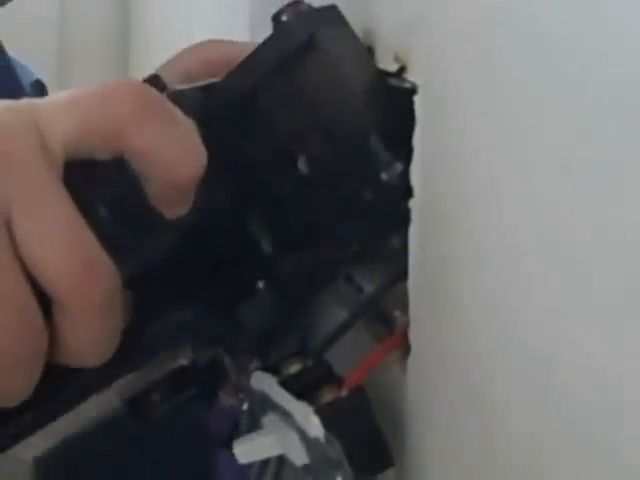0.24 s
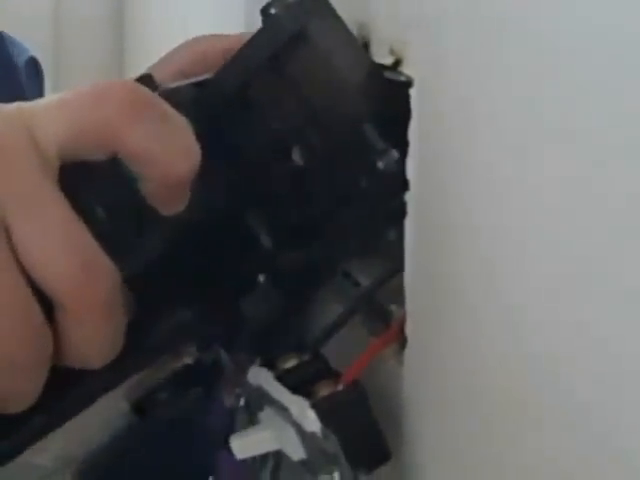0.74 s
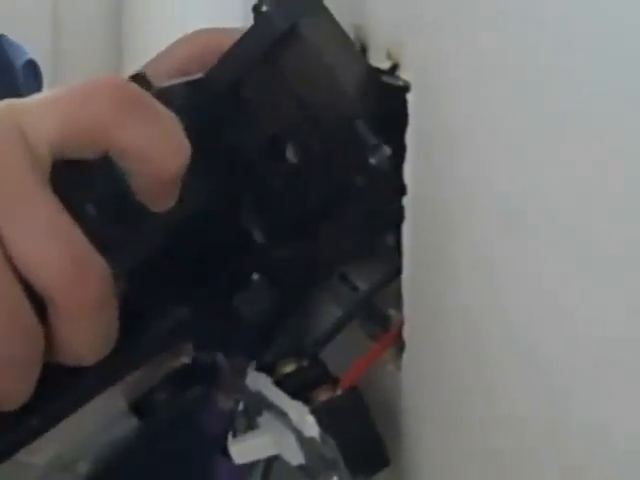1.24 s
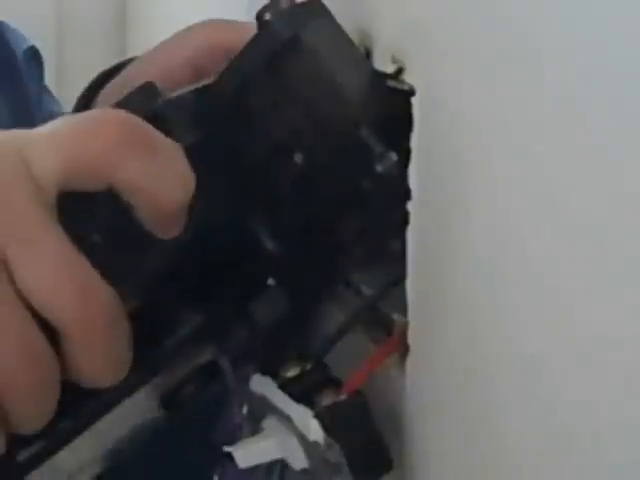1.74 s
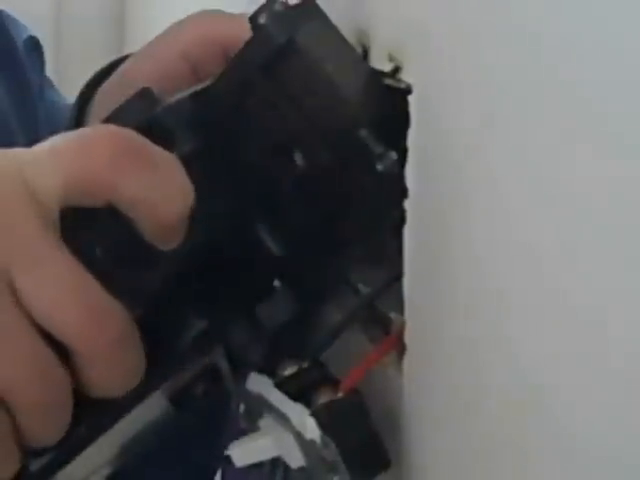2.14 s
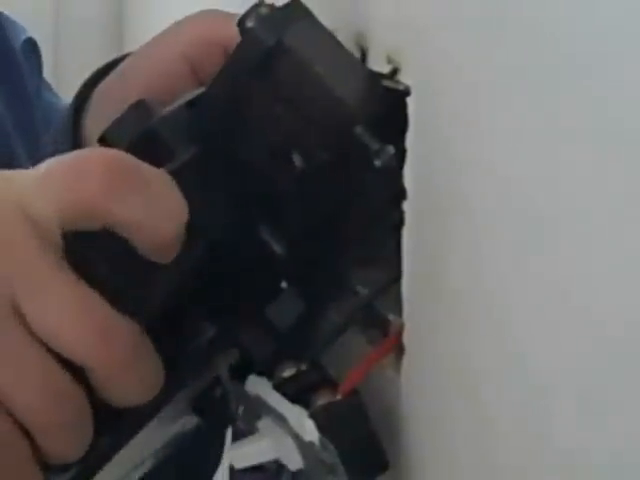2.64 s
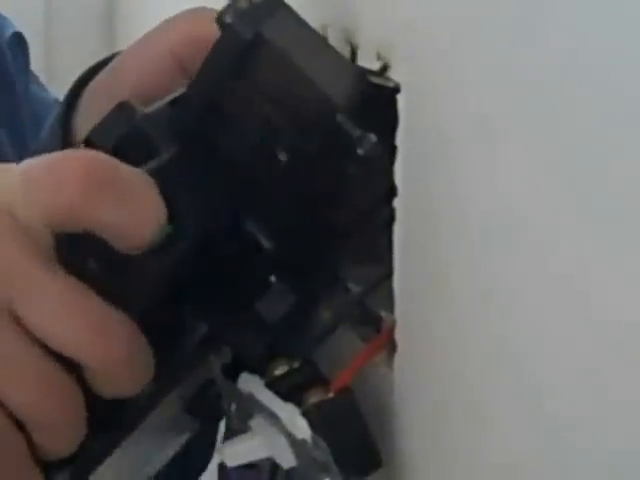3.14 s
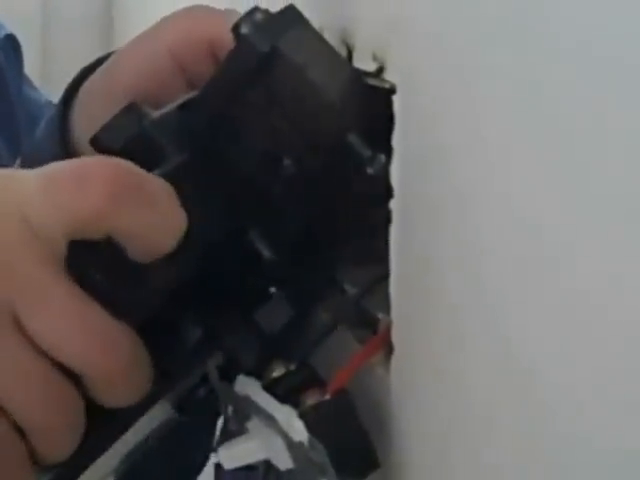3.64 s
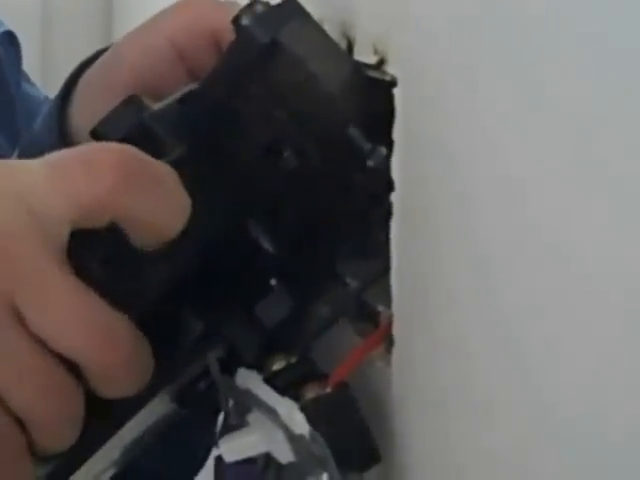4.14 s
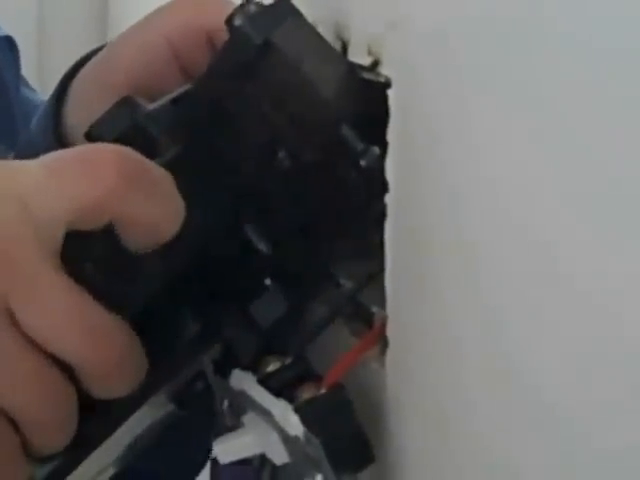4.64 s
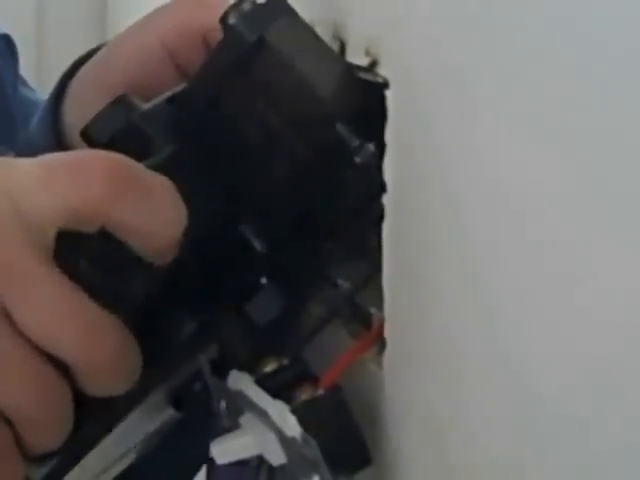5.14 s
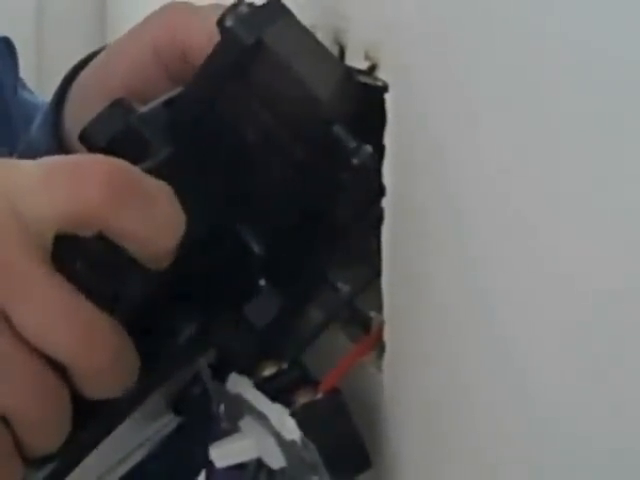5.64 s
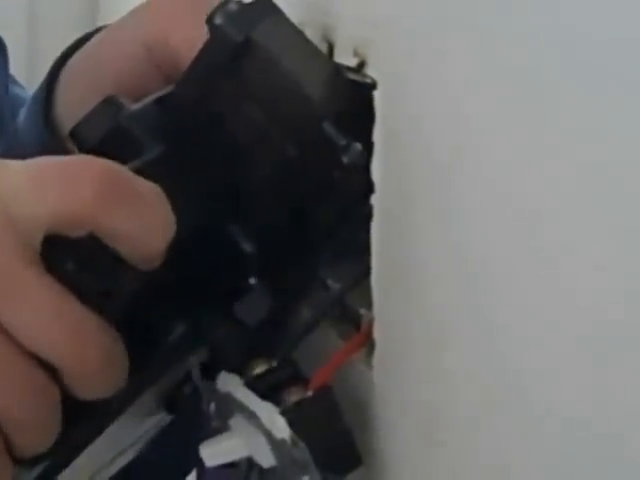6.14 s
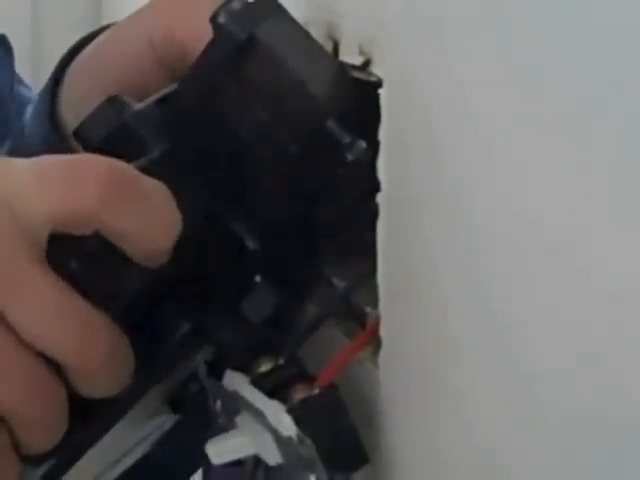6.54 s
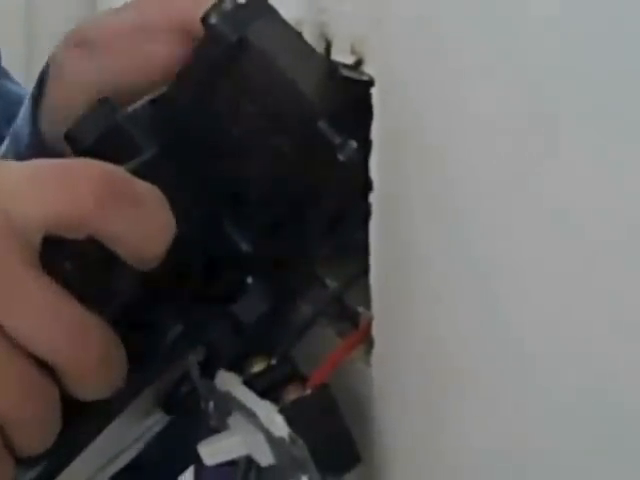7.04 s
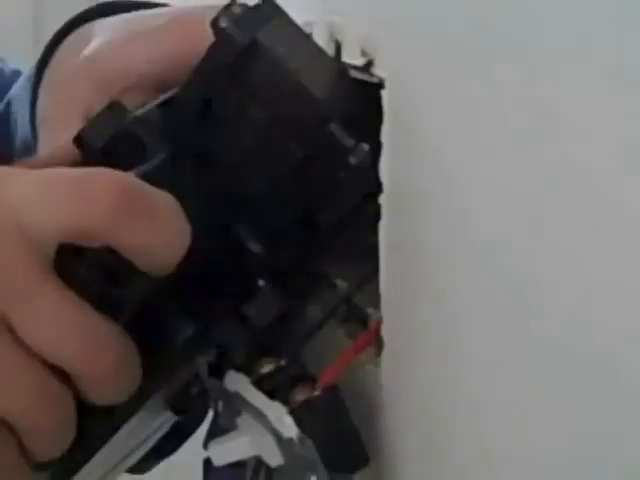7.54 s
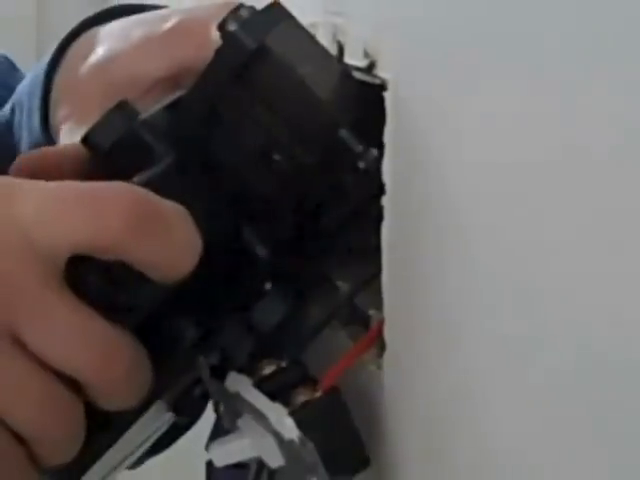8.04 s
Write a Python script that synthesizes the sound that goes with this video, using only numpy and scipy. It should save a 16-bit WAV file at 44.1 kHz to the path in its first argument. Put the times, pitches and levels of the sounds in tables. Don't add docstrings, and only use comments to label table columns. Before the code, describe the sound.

A powered crimping tool is handled very near a phone's two microphones, brighter on the left. Soft grip thuds, plastic clicks and stick-slip creaks surround three loud latch snaps. Then a rough, rattling motor run drops in pitch and cuts out; a second run quickly climbs to a higher, steady whirr and dies away. Quiet bumps and ticks end it, with a short dull room echo and low air noise.

```python
import sys
import numpy as np
from scipy import signal
from scipy.fft import rfft, irfft
from scipy.io import wavfile
from scipy.ndimage import uniform_filter1d

SR = 44100
rng = np.random.default_rng(int(sys.argv[2]) if len(sys.argv) > 2 else 0)


def invert_db(level):
    return 10 ** (np.asarray(level, dtype=float) / 20)


def wav_out(sig):
    wavfile.write(sys.argv[1], SR, np.round(np.clip(np.atleast_2d(sig).T, -1, 1) * 32767).astype(np.int16))


N = 365588
TIME = np.arange(N) / SR


def rms_one(x):
    return x / np.sqrt(np.mean(x ** 2))


def play(tables):
    s, *columns = np.transpose(np.concatenate(tables))
    return [np.interp(TIME, s, column) for column in columns]


def colour(x, points, peaks=(), size=2048):
    hz = np.fft.rfftfreq(2 * size, 1 / SR) + 1
    table = np.array(points, float)
    db = np.interp(np.log(hz), np.log(table[:, 0]), np.maximum(table[:, 1], -90))
    for peak_hz, width_hz, peak_db in peaks:
        db = db + peak_db / (1 + (2 * (hz - peak_hz) / width_hz) ** 2)
    cepstrum = irfft(db * np.log(10) / 20)
    cepstrum[1:size] *= 2
    cepstrum[size + 1:] = 0
    response = irfft(np.exp(rfft(cepstrum)))[:size]
    return signal.oaconvolve(x, response)[:N]


def band(x, low_hz, top_hz, order=3):
    return signal.sosfilt(signal.butter(order, [low_hz, top_hz], "bandpass", fs=SR, output="sos"), x)


def walk(rate_hz):
    hold = max(int(SR / rate_hz), 2)
    steps = np.repeat(rng.standard_normal(N // hold + 1), hold)
    return rms_one(uniform_filter1d(uniform_filter1d(steps, hold), hold)[:N])


def decay(t60_s, size):
    return np.exp(-np.log(1000) * np.arange(size) / SR / t60_s)


def ring(hz, t60_s, size=6000):
    return np.sin(2 * np.pi * hz * np.arange(size) / SR) * decay(max(t60_s, .003), size)


def crack(low_hz, top_hz, t60_s, size=6000):
    burst = rng.standard_normal(size) * decay(max(t60_s, .002), size)
    burst[0] += 3.0
    return band(burst, low_hz, np.clip(top_hz, 2 * low_hz, 16000), order=2)


def add(out, s, sound, peak_db):
    i = int(s * SR)
    piece = sound[:N - i]
    out[i:i + len(piece)] += piece * invert_db(peak_db) / np.abs(piece).max()


# pitch_hz, level_db (per Hz)
ROOM_TONE = [(20, -14.5), (70, 1), (190, -1), (400, -8.5), (1000, -21.5), (2000, -23), (3500, -28),
             (6000, -35), (7800, -29), (9500, -37), (14500, -40.5)]


def room_tone():
    mid, side = (colour(rng.standard_normal(N), ROOM_TONE) for _ in range(2))
    side = side - 0.69 * band(side, 40, 1100, order=1)
    return invert_db(-60 + 0.54 * walk(7.1)) * np.array([mid + side, mid - side]) / np.std(mid)


def room(x, wet_db, near_db, t60_s=0.28, apart_hz=900):
    t = np.arange(int(.5 * SR)) / SR
    near = rng.standard_normal((3, len(t))) * np.exp(-t / .003)
    tail = band(rng.standard_normal((3, len(t))), 60, 6000, order=1)
    tail = tail * decay(t60_s, len(t)) * (t > .004)
    echo = invert_db(near_db) * near / np.linalg.norm(near[0]) + invert_db(wet_db) * tail / np.linalg.norm(tail[0])
    shared = invert_db(-4) * band(echo[0], 100, apart_hz, order=1)
    ports = shared + band(echo[1:], apart_hz, 22000, order=1)
    return invert_db(-1.0) * (x + signal.oaconvolve(x[None], ports, axes=1)[:, :N])


# start_s (of the peak), rumble_db, knock_db, rise_s, fall_s
SHIFTS = [(.01, -61, -64.5, .05, 0.85), (.345, -42, -69, 0.055, 0.25), (.91, -46.5, -72, 0.034, 0.19),
          (1.04, -43, -72, 0.14, 0.16), (1.4, -56, -63, 0.16, 0.43), (1.82, -57, -65.5, 0.35, 1),
          (2.16, -44, -39, 0.0063, 0.11), (2.5, -48, -51.5, 0.041, 0.36), (2.74, -54.5, -52.5, 0.048, 0.4),
          (2.93, -50, -57, 0.18, 0.29), (3.04, -47.5, -47.5, 0.11, 0.47), (3.15, -39, -72, 0.19, 0.12),
          (3.31, -38.5, -62.5, 0.065, 0.34), (4.24, -62.5, -78, 0.34, 0.15), (4.62, -63.5, -72, 0.16, .1),
          (7.85, -58, -66, 0.12, 0.48), (8.015, -52.5, -83, 0.032, 0.55)]
# pitch_hz, level_db (per Hz)
RUSTLE = [(1200, -30), (1600, -12.5), (2800, -11), (4300, -8), (6300, -14.5), (7800, -3), (9500, -17),
          (14000, -27)]


def hands():
    press, tap = 0, invert_db(-74)
    for s, rumble_db, knock_db, rise_s, fall_s in SHIFTS:
        swell = invert_db(-23 * np.where(TIME < s, (s - TIME) / rise_s, (TIME - s) / fall_s))
        press = press + invert_db(rumble_db) * swell
        tap = tap + invert_db(knock_db) * swell
    rumble = rms_one(band(rng.standard_normal(N), 73, 304)) * invert_db(1.8 * walk(25))
    knock = rms_one(band(rng.standard_normal(N), 250, 1200, order=2)) * invert_db(2.4 * walk(60))
    grains = rng.standard_normal(N) * invert_db(2.3 * rng.exponential(size=N) + 2.2 * walk(110))
    rustle = rms_one(colour(grains, RUSTLE)) * invert_db(-7.5)
    return press * rumble + tap * knock + (invert_db(-16) * press + invert_db(-15.5) * tap) * rustle


# start_s (of the
# peak), level_db, length_s, low_hz, top_hz
SCUFFS = [(0.593, -68, 0.13, 3000, 10000), (1.424, -66, 0.11, 1500, 8550), (1.64, -69, .05, 4000, 9500),
          (3.014, -47.5, .06, 500, 1720), (3.09, -47, 0.081, 350, 1510), (4.818, -26.5, 0.037, 450, 2000),
          (4.927, -23, 0.035, 880, 1010), (4.925, -28, .035, 570, 670), (4.92, -30, .04, 1450, 1650),
          (4.9, -51, .4, 70, 140), (5.803, -54.5, 0.39, 60, 110), (6.05, -54, 0.19, 49.7, 90),
          (6.88, -23.5, 0.17, 630, 760), (7.024, -32.5, .12, 600, 720), (4.447, -57, 0.064, 795, 1730),
          (4.448, -65, 0.037, 3520, 10000), (7.712, -37, 0.07, 1330, 1480), (7.845, -57, .1, 870, 980),
          (8.04, -66, 0.078, 3000, 10090), (8.253, -62, 0.038, 790, 2200)]


def scuffs():
    out = 0
    for s, db, length_s, low_hz, top_hz in SCUFFS:
        grains = rng.standard_normal(N) * invert_db(3.1 * walk(150))
        swell = np.exp(-(2 * (TIME - s) / length_s) ** 2)
        out = out + invert_db(db) * rms_one(band(grains, low_hz, top_hz)) * swell
    return out


# start_s, peak_db, pitch_hz, knock_db, decay_s
BUMPS = [(0.341, -31, 151, -16, 0.08), (0.933, -43, 199.6, -5, 0.56), (1.819, -49, 117, -16, 0.1),
         (2.491, -33, 214, 2, 0.15), (2.711, -41.5, 218, 8, 0.033), (2.739, -41, 194, -1, 0.23),
         (3.257, -34, 180, 5.5, 0.035), (3.304, -26.5, 182, -6.5, 0.1), (4.187, -49, 160.5, -5, 0.095),
         (4.582, -46.5, 208, -2, 0.077), (8.015, -39.5, 179, -21, 0.074), (8.234, -42.5, 173.4, -7.5, 0.1)]


def bumps():
    out = np.zeros(N)
    for s, db, hz, knock_db, t60_s in BUMPS:
        modes = ring(hz, t60_s) + 0.23 * ring(1.4 * hz, 0.83 * t60_s)
        soft = np.convolve(modes, np.hanning(120))
        add(out, s, band(soft, 89, 900, order=2), db)
        add(out, s + 0.00305, crack(360, 730, 2.13 * t60_s), db + knock_db)
    return out


# start_s, peak_db, pitch_hz (main ring), low_db
TICKS = [(0.025, -43.5, 2420, 3.5), (0.1077, -51, 2080, -12), (0.1514, -55, 2490, -11),
         (0.3495, -28.5, 7930, -26), (0.9004, -50, 3800, -6), (0.9264, -37.5, 7500, -19),
         (1.46, -39.5, 7800, -13), (1.509, -41, 7400, -18), (1.713, -44.5, 7900, -3),
         (1.7683, -43, 3820, -22), (1.753, -50, 4200, -20), (1.785, -48, 4100, -20),
         (1.862, -42, 7500, -15.5), (1.8978, -49.5, 2230, -2), (2.01, -54.5, 2250, -12),
         (2.062, -47, 4200, -14), (2.1216, -48, 3040, -16), (2.3164, -45, 3830, -21),
         (2.3396, -51, 7900, -25), (2.496, -30.5, 3200, 5.5), (4.0324, -35.5, 8100, -13.5),
         (4.4167, -54, 7700, 8), (4.6552, -35, 4730, -12.5), (4.6721, -7, 7820, -38),
         (5.303, -12, 7850, -18), (6.456, -50, 7900, -25), (6.519, -55, 7930, -20),
         (6.756, -5.5, 7900, -10), (7.2358, -18, 7750, -21), (7.942, -49, 2170, 3), (8.0742, -54, 7930, -7),
         (8.1277, -55, 7660, -17), (8.235, -52, 2150, 6)]
# start_s, peak_db, pitch_hz (main ring), gap_s (to a second catch)
CREAKS = [(2.5096, -32, 2430, 0.012), (2.579, -34.5, 3700, .016), (2.6349, -34.5, 4190, 0.0063),
          (2.6748, -44.5, 2930, 0.0016), (2.7152, -43, 3700, 0.0018), (2.7367, -34.5, 3670, .0208),
          (2.808, -34, 7000, 0.013), (2.8473, -41, 2940, 0), (2.8833, -40.5, 2460, 0),
          (2.92, -37.5, 7300, 0.026), (3.0087, -33, 7500, 0), (3.0989, -40, 3530, 0),
          (3.1834, -25, 3150, 0.023), (3.264, -29, 4340, 0.0029), (3.3182, -30.5, 5080, 0.018),
          (3.3748, -31, 4180, 0), (3.402, -31.5, 4370, 0.0025), (3.4383, -32.5, 5700, 0.01),
          (3.4825, -57, 2495, 0), (3.514, -37.5, 4140, 0.0026), (3.5588, -47, 4200, 0.00099),
          (3.5935, -48, 2440, 0.0031), (3.6242, -46.5, 4250, 0.024)]
# pitch_hz, level_db, decay_s (t60)
CASE_RINGS = [(2460, -12.5, 0.046), (3130, -9.5, 0.063), (4280, -7, 0.045), (4480, -9, .03),
              (5970, -13, 0.009), (7000, -4, .02), (8140, -4.5, 0.022)]


def ticks():
    out = np.zeros(N)
    hits = [(*tick, 0.5) for tick in TICKS]
    hits += [(s, db, hz, -19, 1.5) for s, db, hz, gap_s in CREAKS]
    hits += [(s + gap_s, db - 2, hz, -19, 1.5) for s, db, hz, gap_s in CREAKS if gap_s > .005]
    for s, db, hz, low_db, crack_db in hits:
        case = 0
        for mode_hz, mode_db, t60_s in CASE_RINGS:
            louder, sharper = rng.standard_normal(2)
            case = case + invert_db(mode_db + 2.5 * louder) * ring(mode_hz * (1 + 0.0092 * sharper), t60_s)
        snap = invert_db(crack_db) * crack(2000, 10000, 0.027)
        add(out, s, invert_db(-3.0) * case + invert_db(0.5) * ring(hz, 0.019) + snap, db)
        add(out, s, crack(430, 1200, 0.026), db + low_db)
    return out


# start_s, peak_db, top_hz (crack brightness), decay_s, crack_db
SNAPS = [
    (1.0, -6, 15300, 0.018, -4),
    (2.153, -9, 5800, 0.03, 1.5),
    (3.1624, -2.5, 4900, 0.026, 8),
    (1.655, -43, 3000, .02, 0),
    (1.853, -38, 3000, .015, 3),
]
# pitch_hz, level_db, decay_s (t60)
SNAP_RINGS = [
    [(2600, -14, .008), (3900, -14, .006), (6500, -9, .005), (7600, 0, .008), (8150, -1, .008),
     (10000, -10, .006)],
    [(1050, -9, .05), (2164, -6, .02), (3100, -10, .012), (4183, -11, .025), (7709, -10, .02)],
    [(1050, -10, .09), (1421, -1, .014), (2190, -8, .015), (3176, -10, .018), (4474, -12, .012)],
    [(1050, 0, .07), (1700, -6, .03), (2300, -5, .03)],
    [(1050, 0, .12), (1500, -6, .02), (2250, -3, .03)],
]


def snaps():
    out = np.zeros(N)
    for (s, db, top_hz, t60_s, crack_db), rings in zip(SNAPS, SNAP_RINGS):
        latch = sum(invert_db(mode_db) * ring(hz, mode_s) for hz, mode_db, mode_s in rings)
        add(out, s, invert_db(crack_db) * crack(top_hz / 6, top_hz, t60_s) + latch, db)
    return out


# pitch_hz, level_db
PORT_COLOUR = [(300, 1.5), (5000, -1.5), (7800, 0), (9500, -6.5), (12000, -7.5), (15000, -10.5)]


def clicks():
    return colour(ticks() + bumps() + snaps(), PORT_COLOUR)


# start_s, pitch_hz, level_db
GROAN = [(5.345, 520, -32), (5.38, 788, -30), (5.7, 843, -32), (5.85, 799, -27), (6.05, 757, -32.5),
         (6.15, 787, -28.5), (6.21, 619, -25.5), (6.28, 637, -24), (6.37, 562, -47)]


def groan():
    hz, db = play([GROAN])
    on = uniform_filter1d(1. * (TIME > GROAN[0][0]) * (TIME < GROAN[-1][0]), size=900)
    faces = 0
    for ratio in (.97, 1.06):
        phase = 2 * np.pi * np.cumsum(hz * ratio * (1 + .04 * walk(220))) / SR
        faces = faces + invert_db(4.5 * walk(70)) * np.sin(phase)
    return on * invert_db(db) * faces


# start_s, level_db
PULLS = [
    [(4.67, -39), (4.86, -22), (4.98, -20), (5.214, -27), (5.31, -19), (5.83, -18), (6.05, -32),
     (6.11, -23), (6.29, -25)],
    [(6.519, -48), (6.55, -35), (6.6, -25.5), (6.735, -24), (6.76, -19.5), (6.89, -12), (6.955, -25),
     (7.23, -21.5), (7.6, -23.5)],
]
# start_s, bar_pass_hz
SPEEDS = [
    [(4.9, 1530), (4.958, 1575), (5.08, 1468), (5.202, 1240), (5.29, 1130), (5.692, 1095), (5.926, 1030),
     (6.03, 905), (6.07, 895), (6.145, 1025)],
    [(6.6, 1040), (6.7, 1320), (6.75, 1485), (6.8, 1695), (6.85, 1815), (6.91, 1885), (7.3, 1859),
     (7.6, 1814)],
]
STOPS_S = [6.514, 7.92]
COAST_DB_PER_S = [181.5, 147]


def controls():
    start_hz, coast_s, coast_hz_per_s = 500, .3, 2700
    speed, rattle_db = [], []
    for pull, run, stop_s, coast_db in zip(PULLS, SPEEDS, STOPS_S, COAST_DB_PER_S):
        end_s, end_hz = run[-1]
        speed += [(pull[0][0], start_hz), *run, (end_s + coast_s, end_hz - coast_hz_per_s * coast_s)]
        release_s, release_db = pull[-1]
        rattle_db += [*pull, (stop_s, release_db - coast_db * (stop_s - pull[0][0] - (release_s - pull[0][0])))]
    return play([speed]) + play([rattle_db])


# start_s, end_s, once_a_bar_db, twice_a_bar_db, thrice_a_bar_db, high_whine_db, shaft_buzz_db
CURRENT = [(4.89, 5.07, -14, -8, -4, -3, -9), (5.07, 5.24, -9, -4, -8, -5, -5),
           (5.24, 5.34, -6, -6, -12, -8, -15), (5.34, 5.71, -13, -6, -14, -14, -20),
           (5.71, 5.88, -7, -11, -12, -14, -24), (5.88, 5.98, -5, -13, -14, -7, -24),
           (5.98, 6.17, -18, -20, -17, -7, -24), (6.6, 6.74, -24, -14, -16, -10, -27),
           (6.74, 6.92, -18, -14, -2, -7, -14), (6.92, 7.58, -18, -25, -19, -19, -22)]


def singing():
    db = np.full((len(CURRENT[0]) - 2, N), -33.)
    for start_s, end_s, *levels in CURRENT:
        db = np.where((TIME >= start_s) * (TIME < end_s), np.array(levels)[:, None], db)
    return uniform_filter1d(db, size=int(.05 * SR))


def rattle(turn):
    contacts_db = 1.4 * rng.exponential(size=N) + 2.0 * walk(250)
    return rms_one(rng.standard_normal(N) * invert_db(contacts_db + 2.0 * np.cos(turn)))


def patchy(x, depth_db=2.3, wide_hz=450, long_s=.06):
    z = signal.stft(x, nperseg=512)[2]
    chance = uniform_filter1d(rng.standard_normal(z.shape), size=max(int(wide_hz * 512 / SR), 1), axis=0)
    chance = uniform_filter1d(chance, size=max(int(long_s * SR / 256), 1), axis=1)
    spare_bass = np.clip(np.linspace(0, 11, len(z)), 0, 1)[:, None]
    swell = invert_db(depth_db * chance / chance.std() * spare_bass)
    return signal.istft(z * swell, nperseg=512)[1][:N]


BARS = 5
BAR_ORDERS_DB = [4, .5, -5, -2, -4, -6, -4, -3, -8]
SHAFT_ORDERS_DB = [-18, -7, -1, 3, -7, -11, -12, -13]


def orders(turn, bar_hz):
    *low_db, high_db, buzz_db = singing()
    bars, shaft = 0, 0
    for k in range(1, 46):
        on_bar = k % BARS == 0
        level = invert_db((2.4 if on_bar else 3.7) * walk(60))
        wobble = .7 * walk(110) if on_bar and k > BARS else 0
        tone = level * np.cos(k * turn + 2 * np.pi * rng.random() + wobble)
        tone = tone * (k * bar_hz < .45 * BARS * SR)
        if on_bar:
            i = k // BARS - 1
            current_db = low_db[i] if i < len(low_db) else high_db
            bars = bars + invert_db(BAR_ORDERS_DB[i] + current_db) * tone
        else:
            i = min(k - k // BARS, len(SHAFT_ORDERS_DB)) - 1
            shaft = shaft + invert_db(SHAFT_ORDERS_DB[i]) * tone
    return bars + invert_db(buzz_db) * shaft


# pitch_hz, level_db (per Hz)
TOOL = [(35, -60), (60, -32.5), (184, -11), (349, -21.5), (539, -7), (934, -3.5), (1020, 2), (1230, -12.5),
        (2180, -10.5), (3940, -14), (7830, -5.5), (9190, -15.5), (14200, -27.5)]
# pitch_hz, width_hz, level_db (over the slope)
SHELL = [(206, 76, 3.5), (345, 75, -0.5), (547.6, 97, 9), (620, 40, 5), (679, 43, 3), (780, 150, -7),
         (930, 50, 2), (1045, 60, 4), (1250, 70, -9), (1359, 83, 11.5), (1633, 250, -9), (2430, 60, 7),
         (3030, 80, 4), (3545, 55, 8), (4230, 110, 4), (4650, 70, 3), (5250, 150, 5), (5580, 110, 9),
         (6220, 55, 7), (6610, 65, 4), (7080, 100, 6.5), (7560, 310, 4.5), (7770, 260, 8), (8100, 270, 2.5),
         (8265, 340, 8), (11160, 1000, -3.5), (13500, 1900, 6.5)]
# pitch_hz, width_hz, level_db (over the slope)
FREE_SHELL = [(199, 45, 1.5), (400, 60, 4.5), (544, 130, 9.5), (665, 51, 6), (1222, 45, -5),
              (1395, 190, 11.5), (1600, 92, -4), (1840, 90, 4.5), (2970, 120, 6.5), (4230, 150, 3.5),
              (5255, 160, 10.5), (5550, 110, 6), (6300, 190, 1), (6950, 90, 4), (7630, 170, 5),
              (7800, 260, 7.5), (8400, 400, 9.5), (10600, 1000, -0.5), (13600, 1400, 7.5)]
# low_hz, top_hz, level_db (at the usual rattle), share (followed), most_db (gained that way)
PARTS = [
    (4000, 13000, .8, 0.78, -1),
    (1610, 3740, -8.3, 0.6, 8.5),
    (430, 1470, -6.5, 0.65, 11),
    (130, 416, -12.5, 0.6, 8),
]
# start_s, end_s, level_db of each part
LOADS = [
    (5.12, 6.084, [0, 1.8, -5.5, -6]),
    (6.76, 6.931, [-0.5, 3.5, -1, -1.5]),
]


def motor():
    usual_db, free_s, slew_s, halt_s = -20.5, 6.93, 0.096, .09
    bar_hz, brush_db = controls()
    turn = 2 * np.pi * np.cumsum(bar_hz / BARS * (1 + .006 * walk(130))) / SR
    sung = colour(orders(turn, bar_hz), TOOL, SHELL)

    free = np.clip((TIME - free_s) / slew_s, 0, 1)
    chatter = rattle(turn)
    noise = colour(chatter * np.sqrt(1 - free), TOOL, SHELL)
    noise = patchy(noise + colour(chatter * np.sqrt(free), TOOL, FREE_SHELL))
    other = patchy(colour(rattle(turn), TOOL, SHELL))

    loads = 0
    for start_s, end_s, db in LOADS:
        during = uniform_filter1d(1. * (TIME > start_s) * (TIME < end_s), size=int(slew_s * SR))
        loads = loads + np.array(db)[:, None] * during
    halt_db = 0
    for s in STOPS_S:
        halt_db = halt_db - 11 * np.clip(1 - (s - TIME) / halt_s, 0, 1) * (TIME < s + .004)

    front, back = 0, 0
    for (low_hz, top_hz, db, share, most_db), load_db in zip(PARTS, loads):
        over_db = np.minimum((1 - share) * (usual_db - brush_db), most_db)
        part_db = brush_db + db + over_db + load_db + halt_db * (top_hz > 3000) + 1.0 * walk(25)
        gain = invert_db(part_db) / np.std(band(noise, low_hz, top_hz))
        front = front + gain * band(noise + sung, low_hz, top_hz)
        back = back + gain * band(other, low_hz, top_hz)
    on = (TIME > PULLS[0][0][0]) * (TIME < STOPS_S[-1])
    return front * on, back * on


FAR_SIDE_DB = np.array([[-20], [1]])


def scene():
    front, back = motor()
    far = band(back, 1000, 18000, order=1) * invert_db(FAR_SIDE_DB)
    running = room(front + groan(), wet_db=-17, near_db=-18)
    handling = room(hands() + scuffs() + clicks(), wet_db=-14.5, near_db=-11)
    return running + handling + far + room_tone()


def band_limit(x):
    return signal.sosfilt(signal.butter(12, 14860, fs=SR, output="sos"), x)


# pitch_hz, left_minus_right_db
PORTS = [(60, -1.5), (110, -0.5), (200, -0.5), (370, 0.0), (680, -0.5), (1250, 2), (2300, 6), (4230, 10),
         (7760, 12.5), (14300, 15)]


def record(dry):
    left = colour(dry[0], [(hz, .5 * db) for hz, db in PORTS])
    right = colour(np.roll(dry[1], -2), [(hz, -.5 * db) for hz, db in PORTS])
    both = np.tanh(0.96 * np.array([left, right])) / 1.159
    both = signal.sosfilt(signal.ellip(8, .2, 45, 14350, fs=SR, output="sos"), both)
    return band_limit(both)


dry = scene()
out = record(dry)
wav_out(out)
```